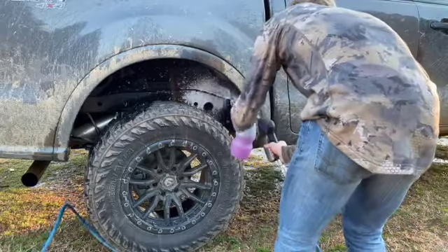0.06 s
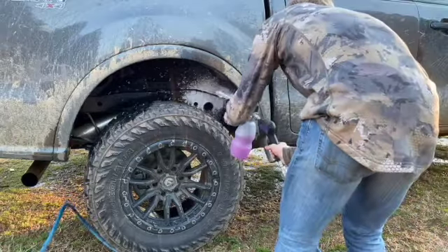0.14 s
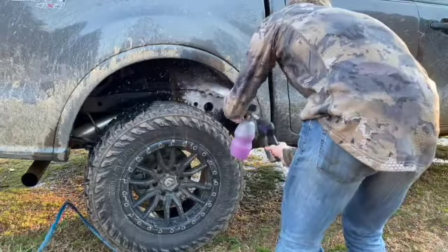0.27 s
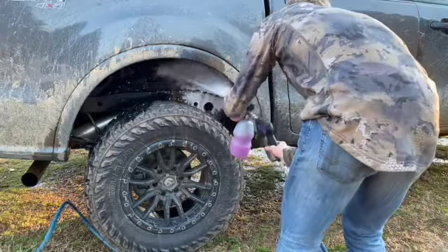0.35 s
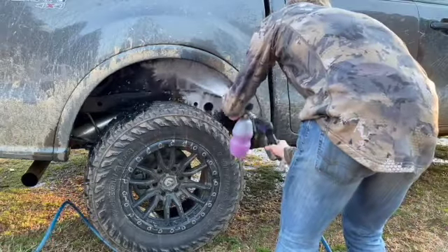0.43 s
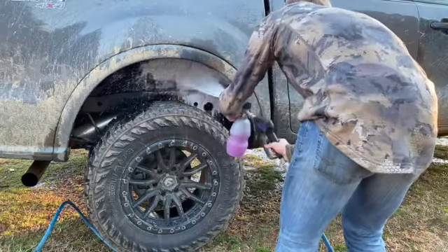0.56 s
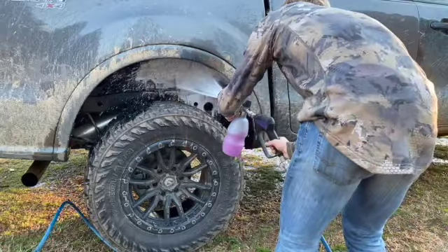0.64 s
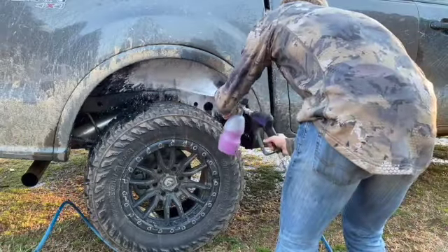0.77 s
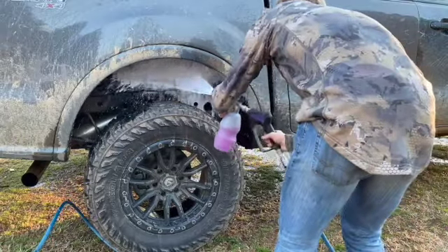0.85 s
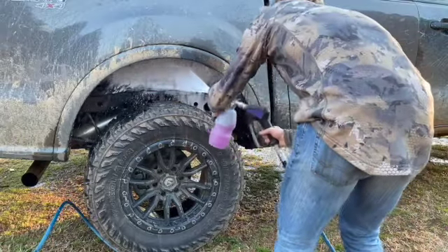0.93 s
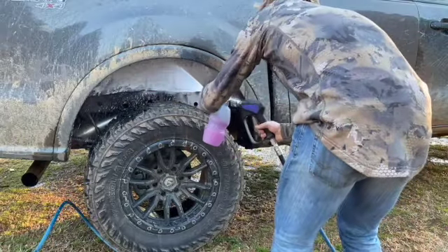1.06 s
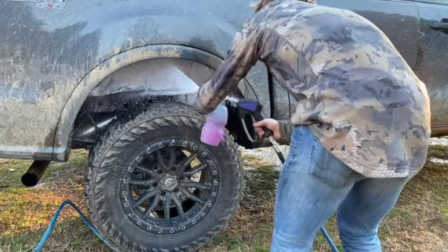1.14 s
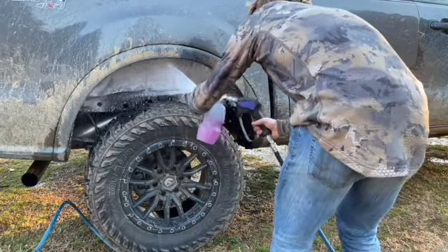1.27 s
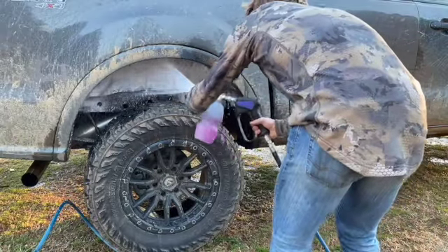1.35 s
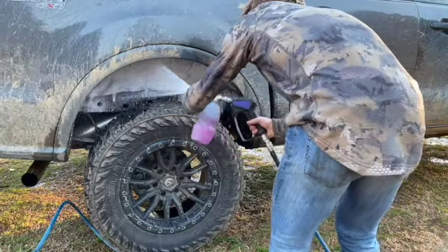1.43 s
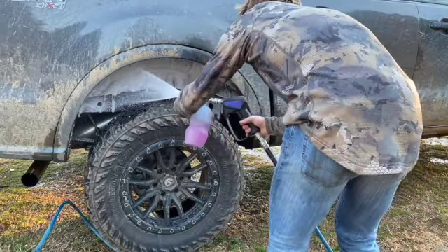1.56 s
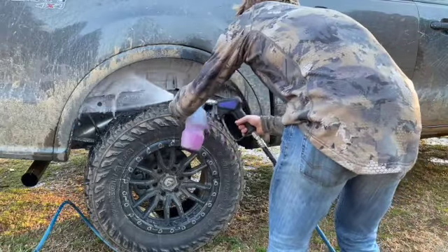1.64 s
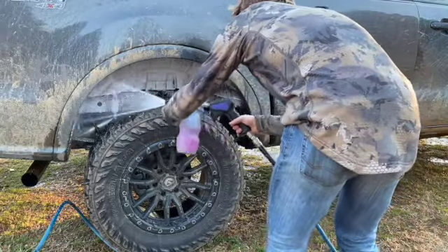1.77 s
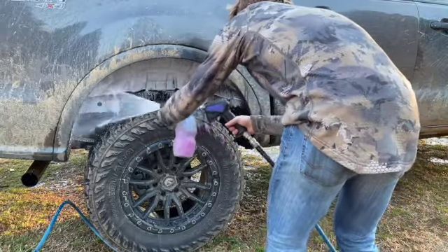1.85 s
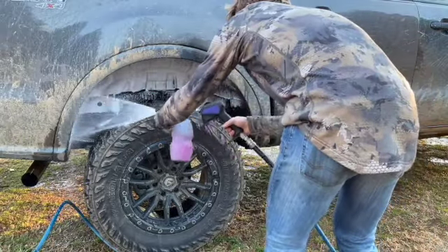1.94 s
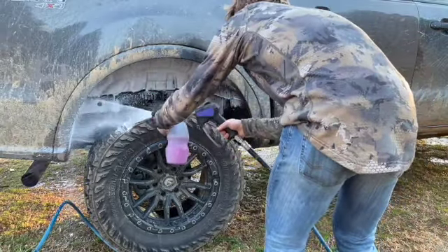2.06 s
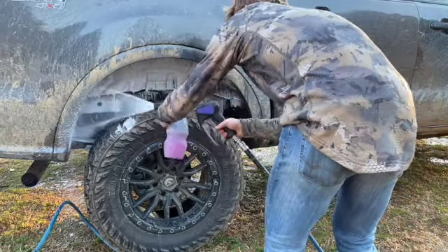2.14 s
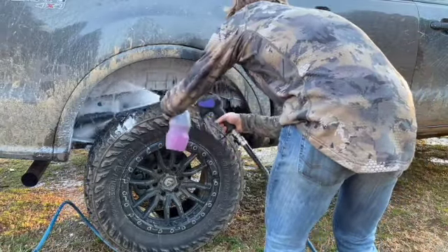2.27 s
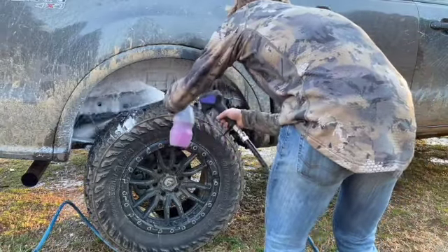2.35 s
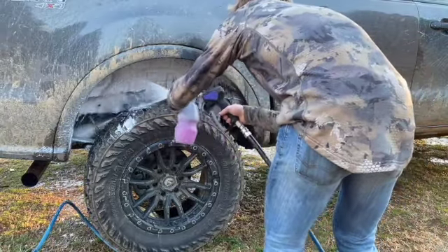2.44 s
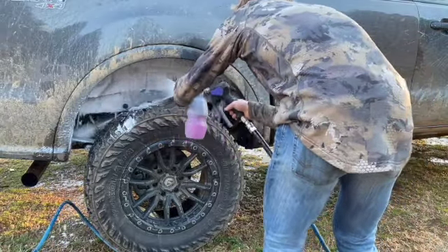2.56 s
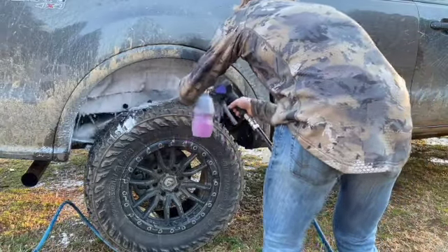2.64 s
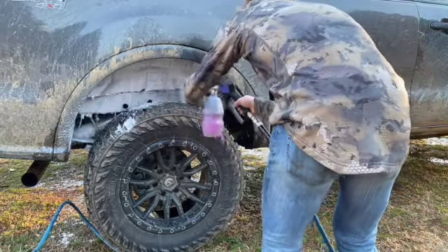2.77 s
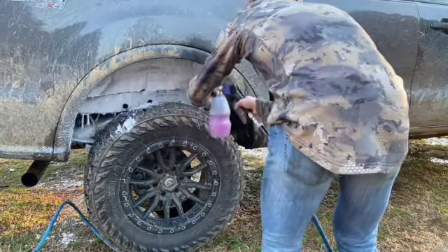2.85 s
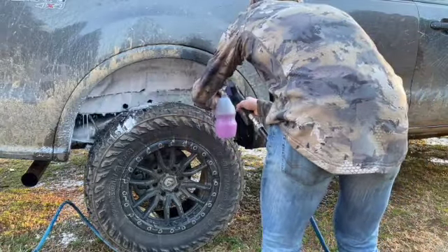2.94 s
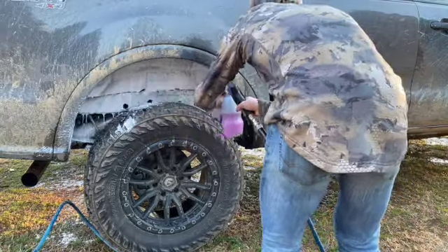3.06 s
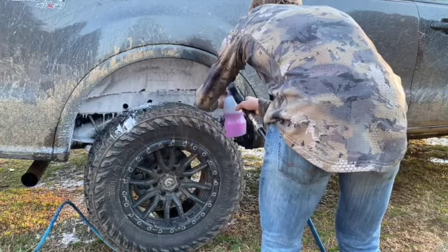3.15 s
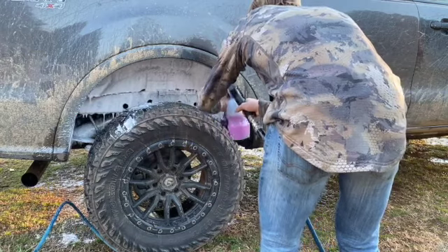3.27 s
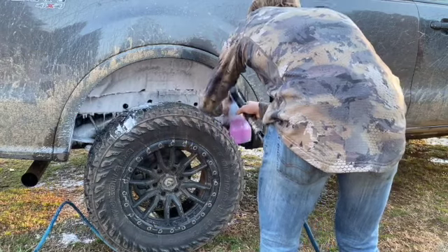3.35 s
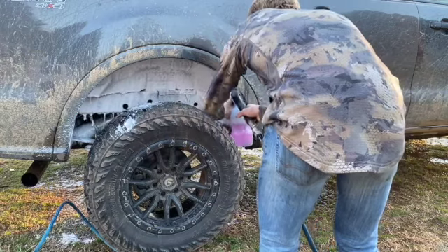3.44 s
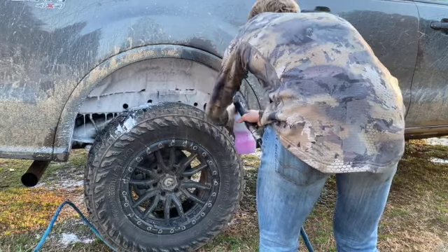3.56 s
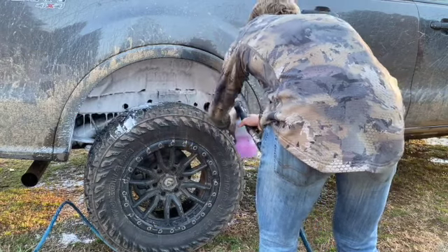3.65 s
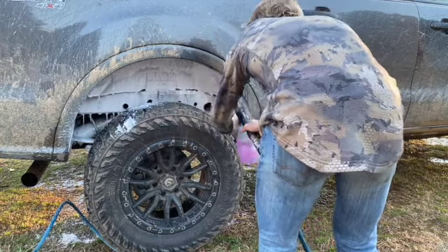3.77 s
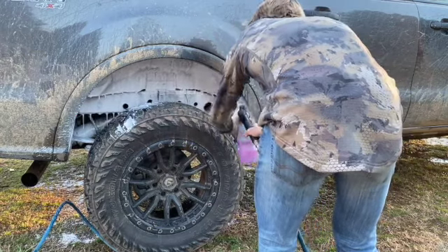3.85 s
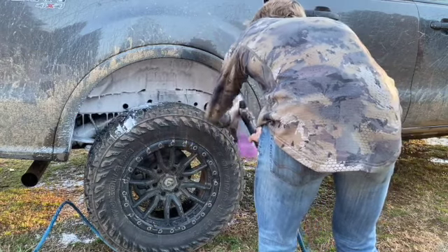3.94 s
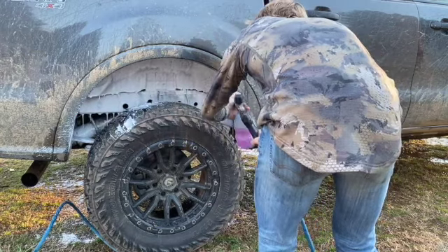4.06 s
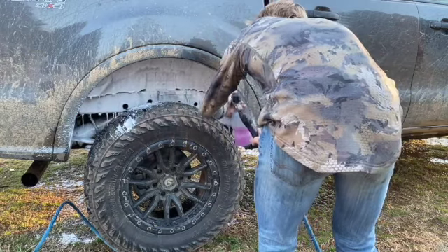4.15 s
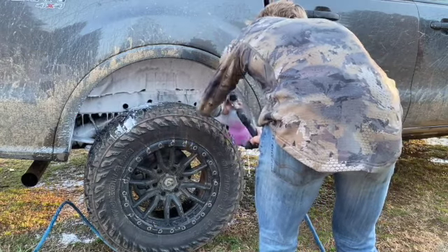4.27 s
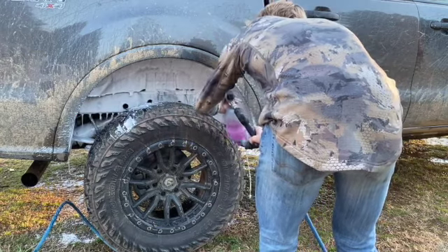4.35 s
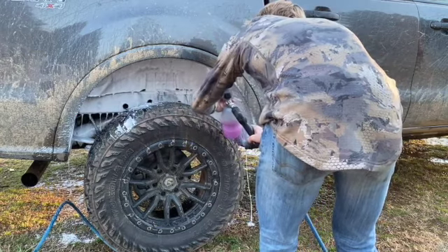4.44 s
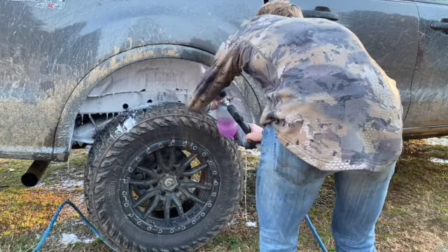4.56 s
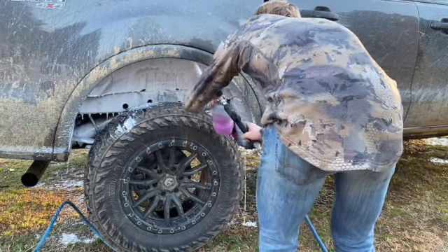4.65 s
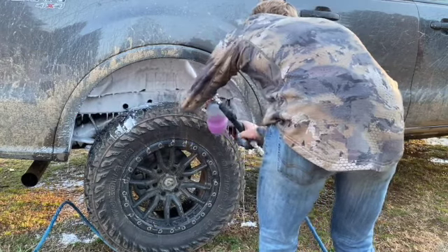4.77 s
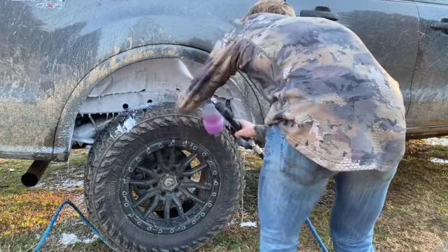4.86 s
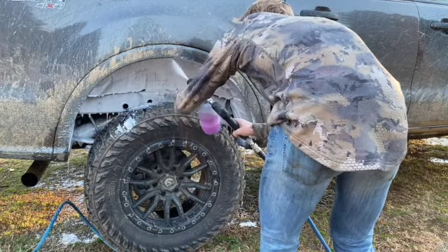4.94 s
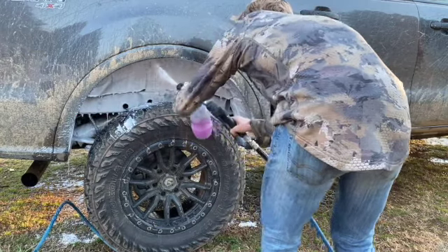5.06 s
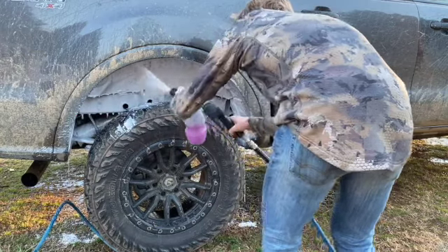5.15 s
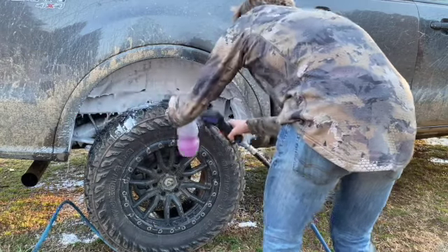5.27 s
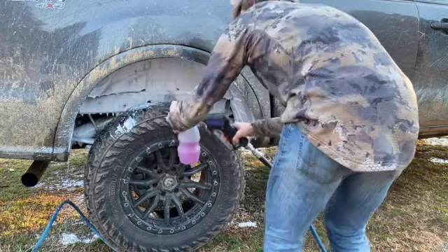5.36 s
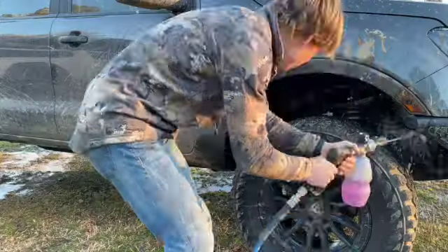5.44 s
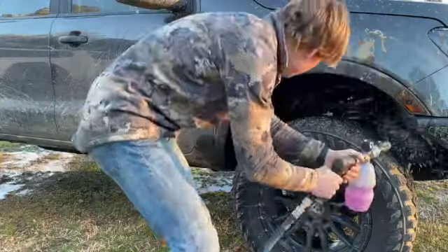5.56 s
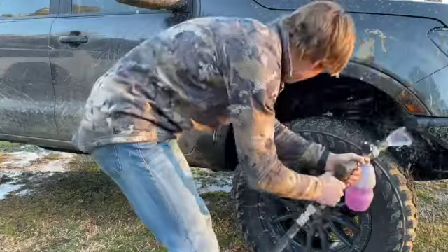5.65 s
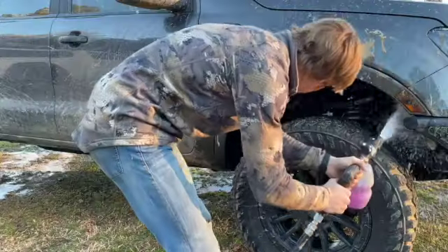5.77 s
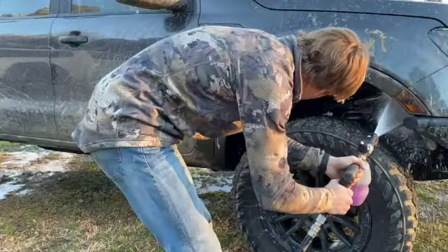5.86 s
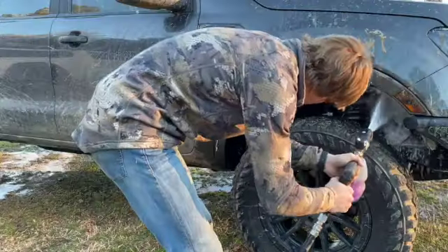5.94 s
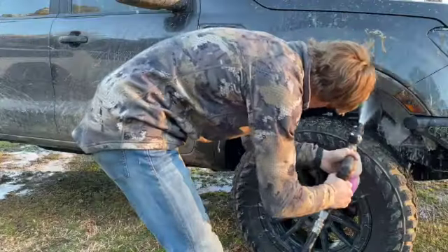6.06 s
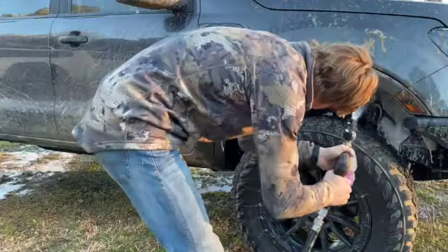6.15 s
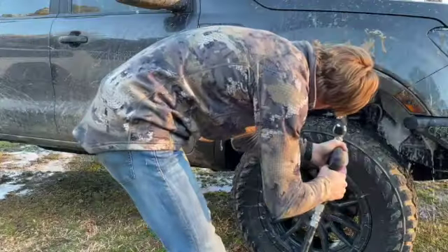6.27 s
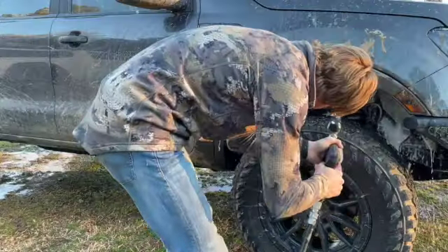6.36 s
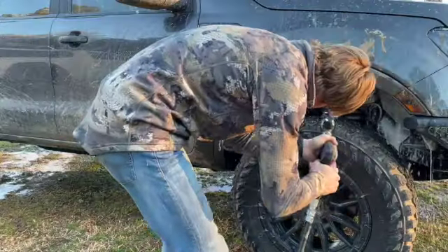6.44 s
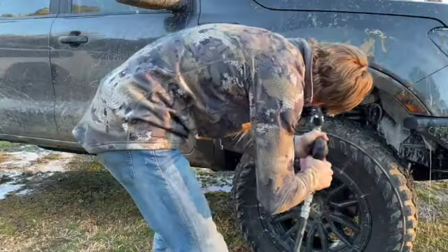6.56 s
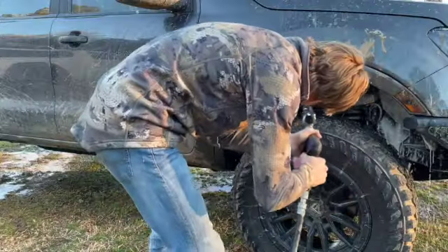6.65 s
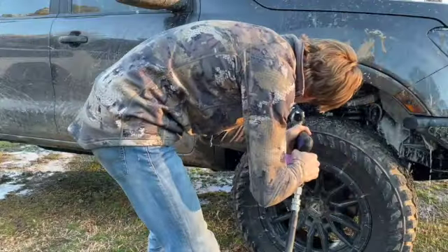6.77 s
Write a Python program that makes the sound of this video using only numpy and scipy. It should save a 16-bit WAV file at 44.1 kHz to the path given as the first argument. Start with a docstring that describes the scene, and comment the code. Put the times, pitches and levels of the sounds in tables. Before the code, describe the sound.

A small trigger click opens, followed by a few quick, hollow spits of water. By about 0.4 seconds a pressure washer is spraying foam into a truck's wheel well with a bright hiss and a brief, thin squeal. The spray holds steady, with faint wavering whistles, droplets pattering on the liner and a breathy, hollow resonance that drifts in pitch as the nozzle moves. A loose panel booms softly near 0.7 and 2.7 seconds. The hiss eases slightly from about 3.2 to 4.3 seconds, then recovers. At 5.2 seconds the jet cuts off and the lance gives several soft clicks. Water spits again around 5.5 seconds and builds to a hard, bright hiss by 5.9, settling over a deeper splash until the end, near 7 seconds. The spray is close and nearly centred, over very faint outdoor air and a distant pump hum.

```python
"""Foam cannon in a truck's wheel wells

A pressure washer sprays foam into the rear wheel well, stops, then starts on the front well.
The jet hisses and whistles, droplets patter on the liner, and the hollow behind each tyre resonates,
its pitch following the nozzle. The trigger clicks and the pump hums some way off, outdoors."""
import sys
import numpy as np
from scipy.fft import rfft, irfft, next_fast_len
from scipy.io import wavfile
from scipy.ndimage import map_coordinates

SR = 44100
rng = np.random.default_rng(int(sys.argv[2]) if len(sys.argv) > 2 else 0)


def log_audio(samples):
    """Write samples as a 16-bit WAV file to the path given in sys.argv[1]."""
    # one column per channel
    frames = np.atleast_2d(samples).T
    # limit to full scale, then quantise
    limited = np.clip(frames, -1, 1)
    pcm = np.round(limited * 32767).astype(np.int16)
    wavfile.write(sys.argv[1], SR, pcm)


N = 300321

# One pull of the trigger. In order: seconds of the spit, the water's arrival, the break into foam and
# the release; strength of the first water in dB; second of a pressure lurch (heard only before foam).
REAR_TRIGGER = (0.5, 0.05, 0.34, 5.207, -1.5, 2)
# How each layer follows the pressure, in dB against its full level.
# In order: spit, water arriving, just before the foam, draining.
SPLASH_STAGES = (-18.5, -9, 1, -21)
LOW_STAGES = (-29, -16, 1, -30)
RING_STAGES = (-38, -26, -1.5, -24)
HISS_STAGES = (-25, -17.5, -4.5, -37)
MIST_STAGES = (-29, -30.5, -8, -44)
# Fader rides on the jet. Each row: time in seconds, hiss in dB, mist in dB.
JET_RIDES = [(0.42, -29.5, -32), (0.78, -26, -31.5), (0.99, -30.5, -34), (1.56, -30, -35.5),
             (1.8, -31.5, -32.5), (2.11, -29, -32), (2.13, -29, -36), (2.92, -27.5, -28.5),
             (3.17, -32.5, -36), (3.55, -33, -40), (4.27, -34.5, -37), (4.48, -30.5, -32),
             (4.55, -32, -32.5), (5.19, -29.5, -34.5)]
# The rear hollow's pitch follows the nozzle. Each row: time in seconds, lowest mode in Hz.
REAR_PITCH = [(0.05, 837), (0.55, 794.6), (0.8, 815), (1.25, 755), (2.1, 790), (2.4, 843), (2.65, 858),
              (2.85, 925.6), (3.25, 865), (3.6, 896), (4.1, 872), (4.4, 934.5), (4.7, 850.3), (5.15, 814)]
# Cancellations between modes. Each row: pitch as a ratio to the lowest mode, width in Hz, share removed.
REAR_NOTCHES = [(0.81, 55, 0.35), (1.27, 58.6, 0.28)]
# Stereo lean. Each row: frequency in Hz, left minus right in dB.
REAR_PAN = [(100, 0), (500, .7), (1200, .2), (5200, .1), (6800, 1.8), (8300, 0), (11200, -1.3), (14000, 0)]
def rear_well():
    """The fan of foam sweeps along the rear arch, splashing, hissing and ringing the hollow."""
    hiss_db, mist_db = curves(JET_RIDES)
    pitch_hz, = curves(REAR_PITCH)
    rest_hz = 800
    stretch = pitch_hz / rest_hz
    deep = passes([(3.62, .53, .98)])  # how far the nozzle dips into the deep hollow
    jet = arch_echoes(droplets())
    sputter_db = .39 * wobble(9) + .26 * wobble(45) + .5 * wobble(170)  # foam leaves unevenly
    ring = flow(REAR_TRIGGER, RING_STAGES) * rear_ring(stretch, deep, hiss_db)
    pocket = liner_pocket()
    splash = flow(REAR_TRIGGER, SPLASH_STAGES) * rear_splash(deep)
    low = flow(REAR_TRIGGER, LOW_STAGES) * rear_low_mode(rest_hz, stretch, deep)
    hiss = amp(hiss_db + .27) * flow(REAR_TRIGGER, HISS_STAGES) * rear_hiss(jet)
    mist = flow(REAR_TRIGGER, MIST_STAGES) * rear_mist(jet, mist_db, deep)
    notches = [(ratio * pitch_hz, width, share) for ratio, width, share in REAR_NOTCHES]
    spray = notched(splash + low + ring + hiss + mist, notches)
    return placed(amp(sputter_db) * (spray + pocket), REAR_PAN)


# Tone of the hiss. Each row: frequency in Hz, relative level in dB.
REAR_HISS_EQ = [(300, -40), (800, -5), (1000, -6), (1200, -4), (1400, -3), (1950, -3.5), (2200, -2),
                (2600, -2), (3200, 0), (3600, 1.5), (4100, -1.5), (5200, -1), (6400, -2), (7300, -12),
                (8500, -15), (11000, -28.5)]
# The hiss dulls when the jet meets the liner squarely. Each row: time in seconds, brightness in dB.
BRIGHTNESS = [(0.15, -6), (0.38, 11.5), (1.1, -0.5), (1.55, 0.5), (1.8, 3.5), (2.15, 3), (2.45, -3),
              (2.85, 1.5), (3.6, 0.5), (4.45, 0)]
# The nozzle's two whistles. Each row: resting pitch in Hz, width in Hz, relative level in dB.
HIGH_WHISTLE = [(3556, 85, 0)]
LOW_WHISTLE = [(3293, 66, 0)]
# Each whistle comes forward. Each row: centre in seconds, half length in seconds, boost in dB.
HIGH_WHISTLE_SWELLS = [(0.305, .025, 9), (0.4, 0.04, 14), (0.56, .04, 3), (1.89, 0.04, 7.5),
                       (2.02, 0.09, 8), (2.28, 0.078, 7.5), (2.54, 0.036, 5), (2.88, 0.049, 7),
                       (3.35, 0.1, 8), (3.8, 0.068, 9), (5.0, .1, 3.5)]
LOW_WHISTLE_SWELLS = [(0.37, .05, 12.5), (0.54, .04, 7), (3.42, .09, 14), (3.8, 0.077, 10)]
# The high whistle follows the nozzle. Each row: time in seconds, pitch in Hz.
WHISTLE_PITCH = [(0.3, 3790), (0.42, 3705), (0.56, 3610), (0.8, 3650), (1.65, 3510), (2.3, 3570),
                 (2.9, 3520), (3.3, 3620), (3.55, 3520), (4.1, 3600), (5.0, 3640)]
def rear_hiss(jet):
    """The jet's hiss tilts as it meets the liner, and carries two wavering whistles."""
    bright_db, = curves(BRIGHTNESS)
    tone = coloured(jet, REAR_HISS_EQ)
    pivot_hz = 3800
    dull = filtered(tone, lambda hz: 1 / (1 + (hz / pivot_hz) ** 4))
    tilted = amp(-bright_db) * dull + amp(.5 * bright_db) * (tone - dull)
    high_gain = amp(-13.5 + passes(HIGH_WHISTLE_SWELLS) + 1.2 * wobble(14))
    low_gain = amp(-18.5 + passes(LOW_WHISTLE_SWELLS))
    whistle_hz = curves(WHISTLE_PITCH)[0] * (1 + .006 * wobble(12))
    high = high_gain * swept(HIGH_WHISTLE, whistle_hz / HIGH_WHISTLE[0][0])
    low = low_gain * swept(LOW_WHISTLE, 1 + .007 * wobble(8))
    return (tilted + high + low) / np.sqrt(1 + high_gain ** 2 + low_gain ** 2)


# Tone of the mist. Each row: frequency in Hz, relative level in dB.
REAR_MIST_EQ = [(4290, -28), (7300, -3.5), (11500, 0), (15100, -7.5), (16000, -8)]
def rear_mist(jet, mist_db, deep):
    """Fine mist; the louder it is, the more of its highest fizz gets past the arch."""
    shadow_hz, shadow_width_hz, fizz_hz = 7748, 390, 11500
    tone = coloured(jet, REAR_MIST_EQ)
    shadow = filtered(tone, lambda hz: np.exp(-((hz - shadow_hz) / shadow_width_hz) ** 2))
    tone = tone - .51 * deep * shadow  # the deep hollow swallows this band
    fizz = filtered(tone, lambda hz: 1 - 1 / (1 + (hz / fizz_hz) ** 8))
    opening_db = .4 * np.clip(mist_db + 29, -8, 6)
    return amp(mist_db - .34) * (tone + (amp(opening_db) - 1) * fizz)


# The rear hollow's main ring, its overtones, and the ring of its deep part.
# Each row: resting pitch in Hz, width in Hz, relative level in dB.
MAIN_MODE = [(1175, 162, 0)]
OVERTONE_MODES = [(1550, 270, 0), (1840, 144, 0)]
DEEP_HOLLOW_MODES = [(1270, 170, 3.5), (1427, 130, -2), (1737, 120, -2.5)]
# Fader ride on the whole ring. Each row: time in seconds, level in dB.
RING_RIDE = [(0.42, -31.5), (0.55, -31), (0.68, -29), (0.88, -29), (1.0, -26.5), (1.12, -30), (1.24, -33),
             (1.42, -31.5), (2.19, -36), (3.09, -35.5), (3.4, -33), (3.6, -34), (3.8, -35), (3.95, -39),
             (4.25, -37.5), (4.6, -34.5), (5.19, -34)]
# Overtone balance. Each row: time in seconds, level against the main ring in dB.
OVERTONE_RIDE = [(0.24, -5), (0.3, 2), (0.45, -3.5), (0.8, -4.5), (1.02, -7), (1.5, -4), (2.4, -1.5),
                 (4.2, 0), (4.6, 1), (5.15, -1.5)]
# The deep hollow follows the nozzle. Each row: time in seconds, strongest mode in Hz.
DEEP_PITCH = [(3.1, 1221), (3.45, 1275), (3.82, 1364), (4.0, 1200), (4.6, 1220)]
# The ring drums briefly. Each row: centre in seconds, half length in seconds, level change in dB.
RING_ACCENTS = [(0.244, .012, 8), (0.295, .018, 5), (0.647, 0.0073, 4.5), (3.31, .01, -1), (3.385, .012, 2)]
def rear_ring(stretch, deep, hiss_db):
    """Spray rings the upper modes behind the rear tyre, crossfading into those of the deep hollow."""
    ring_db, = curves(RING_RIDE)
    deep_hz, = curves(DEEP_PITCH)
    overtone_gain = amp(curves(OVERTONE_RIDE)[0])
    shift = stretch ** .4  # these modes bend less than the lowest
    shallow = swept(MAIN_MODE, shift) + overtone_gain * swept(OVERTONE_MODES, shift)
    shallow /= np.hypot(1, overtone_gain)
    deep_ring = swept(DEEP_HOLLOW_MODES, deep_hz / DEEP_HOLLOW_MODES[0][0])
    ring = np.sqrt(1 - deep) * shallow + np.sqrt(deep) * deep_ring
    # when the jet points out of the hollow, its bare hiss takes over from the ring
    inside = np.sqrt(np.clip(1 - amp(2 * (hiss_db - ring_db - 9.5)), .08, 1))
    return amp(ring_db + 1.07 - 2.5 * deep + passes(RING_ACCENTS)) * inside * ring


# Surges and dips. Each row: centre in seconds, half length in seconds, level change in dB.
LOW_MODE_SURGES = [(0.55, .05, 5.5), (1.35, .07, 1), (1.9, 0.12, 1), (2.55, .07, -1), (2.97, 0.08, -4.5),
                   (3.52, 0.1, 2.5), (4.0, .1, -3), (4.8, 0.38, 1), (5.175, 0.016, 4), (5.215, 0.017, -17)]
def rear_low_mode(rest_hz, stretch, deep):
    """Spray drives the rear hollow's lowest mode, a breathy note that glides with the nozzle."""
    width_hz = 105
    level_db = -36.5 + .5 * deep + passes(LOW_MODE_SURGES) + .52 * wobble(10)
    return amp(level_db) * swept([(rest_hz, width_hz, 0)], stretch * (1 + .01205 * wobble(6)))


# Tone of the splash. Each row: frequency in Hz, relative level in dB.
REAR_SPLASH_EQ = [(50, -50), (110, -30), (195, -19.5), (265, -9), (330, -8), (400, -2.5), (500, 1.5),
                  (580, -1), (680, 1), (1000, -10.5), (1600, -11.5), (2600, -30)]
# A loose panel's boom. Each row: pitch in Hz, width in Hz, relative level in dB.
PANEL_MODE = [(149, 31, -2)]
# Splash and boom swell or ebb. Each row: centre in seconds, half length in seconds, level change in dB.
SPLASH_SWELLS = [(1.15, .3, -2.5), (1.68, 0.085, 4), (2.5, .1, 1.5), (2.95, 0.17, -0.5), (3.78, .09, 0.5)]
BOOM_SWELLS = [(0.7, 0.55, 12.5), (1.95, .25, 2), (2.73, 0.19, 11.5), (3.85, .3, -4), (5.17, .12, 11)]
def rear_splash(deep):
    """Droplets patter on the rear liner, and a loose panel booms as the jet crosses it."""
    boom = amp(-27.5 + passes(BOOM_SWELLS)) * resonate(droplets(), PANEL_MODE)
    level_db = -38.5 + .7 * deep + passes(SPLASH_SWELLS) + .95 * wobble(9)
    return amp(level_db) * (coloured(droplets(), REAR_SPLASH_EQ) + boom)


# The pocket's note. Each row: pitch in Hz, width in Hz, relative level in dB.
POCKET_MODE = [(716, 75, 0)]
# Passes over it. Each row: centre in seconds, half length in seconds, peak level in dB.
POCKET_SWELLS = [(2.199, .07, -43), (2.76, 0.18, -38), (3.78, 0.068, -38.5), (4.65, 0.27, -41)]
def liner_pocket():
    """The jet catches a lower-pitched pocket of the liner in passing."""
    gain = passes([(s, half_s, amp(db)) for s, half_s, db in POCKET_SWELLS])
    return gain * resonate(droplets(), POCKET_MODE)


# The second pull of the trigger, laid out like REAR_TRIGGER.
FRONT_TRIGGER = (5.474, 5.574, 5.858, 7.0, 2.1, 5.757)
# Tone of the splash, hiss and mist. Each row: frequency in Hz, relative level in dB.
FRONT_SPLASH_EQ = [(50, -44), (130, -17), (200, -19), (270, -10), (400, -3), (470, 1.5), (510, 6),
                   (560, -2.5), (650, 2), (780, -11), (1000, -10), (2000, -32)]
FRONT_HISS_EQ = [(500, -42), (1050, -10), (1300, -2.5), (1550, 4.5), (2000, 1.5), (2400, 3), (3400, 3.5),
                 (4000, 2.5), (4600, 1.5), (5500, -1.5), (6400, -0.5), (7300, -18), (8500, -18),
                 (11000, -35)]
FRONT_MIST_EQ = [(4290, -23), (7300, -0.5), (7800, -2.5), (11000, -3), (13000, -10), (14100, -10),
                 (15200, -14), (16000, -19)]
# The hollow's midrange body, and the ring that nozzle and arch give the hiss.
# Each row: pitch in Hz, width in Hz, relative level in dB.
BODY_MODES = [(1097, 120, 4), (836, 220, 1.5)]
ARCH_MODES = [(2910, 190, -6.5), (4000, 150, -3.5), (5530, 580, -3), (6220, 780, -4)]
# Water slaps the liner unevenly. Each row: centre in seconds, half length in seconds, change in dB.
FRONT_SLAPS = [(5.62, 0.033, 2.5), (5.7, 0.023, -1.5), (5.78, 0.031, 2.5), (6.52, 0.033, 4)]
# A steady cancellation in the hollow. Each row: frequency in Hz, width in Hz, share removed.
FRONT_NOTCHES = [(940, 61, 0.29)]
# Another rises as the foam forms. Each row: time in seconds, frequency in Hz.
RISING_NOTCH = [(5.6, 1000), (5.8, 1100), (5.9, 1340), (6.3, 1320), (6.8, 1318)]
def front_well():
    """The jet hits the front arch, hard and bright while fresh, then settles over a deep splash."""
    foam_s, settle_s = FRONT_TRIGGER[2], .53
    fresh = np.exp(-since(foam_s) / settle_s)
    jet = arch_echoes(droplets())
    sputter_db = .69 * wobble(45) + .5 * wobble(170)
    splash_gain = amp(-35 + passes(FRONT_SLAPS) + 1.8 * wobble(7.9))
    splash = splash_gain * flow(FRONT_TRIGGER, SPLASH_STAGES) * coloured(droplets(), FRONT_SPLASH_EQ)
    body = amp(-38 - 2.5 * fresh) * step(foam_s, .1) * resonate(droplets(), BODY_MODES)
    ring = amp(-36 + .5 * fresh) * front_ring(foam_s)
    hollow = flow(FRONT_TRIGGER, RING_STAGES) * (body + ring)
    arch_gain = amp(-9.5 + 15.5 * fresh) * step(foam_s, .13)  # only the foaming jet rings the arch
    arch = arch_gain * resonate(droplets(), ARCH_MODES)
    tone = (coloured(jet, FRONT_HISS_EQ) + arch) / np.hypot(1, arch_gain)
    hiss = amp(-32 + 4 * fresh) * flow(FRONT_TRIGGER, HISS_STAGES) * tone
    mist = amp(-38.5 + 6 * fresh) * flow(FRONT_TRIGGER, MIST_STAGES) * coloured(jet, FRONT_MIST_EQ)
    rising = (curves(RISING_NOTCH)[0], 89, .51)  # Hz, width in Hz, share removed
    spray = notched(splash + hollow + hiss + mist, [*FRONT_NOTCHES, rising])
    return placed(amp(sputter_db) * spray, FRONT_PAN)


# The front hollow's bright modes. Each row: resting pitch in Hz, width in Hz, relative level in dB.
FRONT_HOLLOW_MODES = [(1600, 160, 0), (1788, 89, -1)]
# They follow the nozzle. Each row: time in seconds, lower mode in Hz, upper mode in Hz.
FRONT_PITCHES = [(5.721, 1563, 1750), (5.95, 1546, 1820), (6.08, 1558, 1848), (6.27, 1640, 1722),
                 (6.52, 1685, 1790), (6.8, 1688, 1820)]
# The jet crosses the hollow's mouth. Each row: centre in seconds, half length in seconds, boost in dB.
MOUTH_SWELLS = [(5.6, .04, 1), (5.745, 0.042, 6.5), (6.29, 0.09, 4.5)]
def front_ring(foam_s):
    """Two modes behind the front tyre draw together and part; the upper grows in as the foam forms."""
    lower, upper = [amp(db) * swept([(rest_hz, width, db)], hz / rest_hz)
                    for (rest_hz, width, db), hz in zip(FRONT_HOLLOW_MODES, curves(FRONT_PITCHES))]
    return amp(passes(MOUTH_SWELLS)) * (lower + step(foam_s, .3) * upper)


def flow(trigger, stages):
    """A layer's gain through one pull: spit, rising pressure, full foam, shut-off and draining."""
    spit_s, water_s, foam_s, release_s, first_db, lurch_s = trigger
    spit_db, water_db, almost_db, drain_db = stages
    arrive_s, break_s, lurch_share = .031, .019, .23
    spit_db_per_s, shut_db_per_s, drain_db_per_s = 87, 529, 55
    spit = step(spit_s, .004) * amp(first_db + spit_db - spit_db_per_s * since(spit_s))
    ramp = np.clip(since(water_s) / (foam_s - water_s), 0, 1) ** 1.26  # builds slowly, then faster
    pressure = (1 - lurch_share) * ramp + lurch_share * step(lurch_s, .012)
    building_db = (first_db + water_db) * (1 - pressure) + almost_db * pressure
    jet = step(water_s, arrive_s) * amp(building_db * (1 - step(foam_s, break_s)))
    collapse = amp(-shut_db_per_s * since(release_s))
    drain = amp(drain_db - drain_db_per_s * since(release_s))
    return np.hypot(spit, jet) * np.maximum(collapse, drain)


def droplets(size=N, per_s=1400, spread_db=4, drop_db=-6):
    """Turbulent rush plus single droplet impacts of random size."""
    lands = rng.random(size) < per_s / SR
    strength = amp(spread_db * np.clip(rng.standard_normal(size), -2, 2))
    rush = rng.standard_normal(size)
    hits = lands * strength * rng.choice([-1, 1], size)
    return unit(rush + amp(drop_db) * unit(hits))


def swept(modes, stretch):
    """Spray-driven resonances whose pitches all move by the factor stretch."""
    ring = resonate(droplets(size=N + N // 4), modes)
    return map_coordinates(ring, [np.cumsum(stretch)], order=1, mode="wrap")


def arch_echoes(x, count=6, gain=.14, near_s=.0012, far_s=.005, drift_s=.00022):
    """Close reflections off tyre and arch; their paths drift as the nozzle moves."""
    delays_s = np.geomspace(near_s, far_s, count) * rng.uniform(.849, 1.15, count)
    echoes = [map_coordinates(x, [np.arange(N) - SR * (delay + drift_s * wobble(2.5))], order=3)
              for delay in delays_s]
    return unit(x + gain * sum(echoes))


# Stereo lean of the front well. Each row: frequency in Hz, left minus right in dB.
FRONT_PAN = [(200, -.5), (500, 1.5), (1100, 1.5), (1700, 2.6), (2700, 0.6), (5200, 0), (7000, 3.5),
             (8700, -0.5)]
# Colour of the side signal. Each row: frequency in Hz, side-channel level in dB.
SIDE_EQ = [(60, -39), (190, -13), (380, -31.5), (630, -15.5), (1100, -54), (3500, -100), (6000, -15.5),
           (8000, -41), (10500, -19), (13000, -33), (15000, -63)]
def placed(x, pan):
    """A nearly mono source, leaning between the ears, with a faint, slightly late difference added between the
    channels."""
    late = np.pad(x, (SR // 140, 0))[:N]
    side = filtered(late, lambda hz: amp(along(SIDE_EQ, hz)))
    stereo = np.array([x + side, x - side])
    return filtered(stereo, lambda hz: amp(np.outer([.5, -.5], along(pan, hz))))


# The first slugs of water. Each row: start in seconds, level in dB.
SLUGS = [(0.092, -32), (0.121, -27), (0.27, -24)]
def gulps(pitch_hz=848, attack_s=.0033, t60_s=.1):
    """Each slug of water rings the rear hollow's lowest mode, which dies quickly."""
    out = np.zeros(N)
    for start_s, db in SLUGS:
        age = since(start_s)
        envelope = amp(db - 60 * age / t60_s) * (1 - np.exp(-age / attack_s))
        out += envelope * np.sin(2 * np.pi * pitch_hz * age + .47 * wobble(150))
    return out


# Squeals, mostly while the pressure builds.
# Each row: start in seconds, hold in seconds, pitch in Hz, width in Hz, level in dB.
NOZZLE_SQUEALS = [(0.065, 0.16, 11300, 600, -62), (0.283, 0.046, 6500, 300, -40),
                  (0.358, .035, 6000, 250, -35), (0.43, .36, 6320, 240, -41),
                  (4.07, 0.11, 6100, 200.1, -43), (5.762, .1, 6080, 140, -42), (5.865, .04, 6400, 700, -36)]
def squeals(attack_s=.0086, fade_db_per_s=200):
    """The nozzle sings in a thin, high band that opens at once and fades."""
    out = np.zeros(N)
    for start_s, hold_s, hz, width, db in NOZZLE_SQUEALS:
        envelope = step(start_s, attack_s) * amp(db - fade_db_per_s * since(start_s + hold_s))
        out += envelope * resonate(droplets(), [(hz, width, 0)])
    return out


# Handling clicks, and a drip of water after the shut-off. Each row: start in seconds, level in dB, pitch in Hz.
TICKS = [(0.051, -42, 2900), (5.263, -51, 4700), (5.366, -53, 2285), (5.381, -51, 1240),
         (5.415, -45, 1100), (5.417, -48, 1970), (5.478, -44, 2670)]
def clicks(attack_s=.001, t60_s=.036):
    """Small dull clicks of the trigger and plastic lance, and a drip of water after the shut-off."""
    t, out = np.arange(SR // 4) / SR, np.zeros(N)
    for start_s, db, hz in TICKS:
        ring = resonate(rng.standard_normal(len(t)), [(hz, .19 * hz, 0)])
        envelope = amp(db - 60 * t / t60_s) * (1 - np.exp(-t / attack_s))
        out[round(start_s * SR):][:len(t)] += envelope * ring
    return out


# The pump's hum. Each row: multiple of the stroke rate, relative level in dB.
PUMP_HARMONICS = [(1, 3.5), (2, -12), (3, 1.5), (5, 0)]
def pump(stroke_hz=80, idle_db=-70, loaded_db=-62.5, front_db=-79, stop_db_per_s=50):
    """The pump's strokes hum at a nearly steady rate, louder under load and much fainter from the second pull
    on."""
    foam_s, release_s = REAR_TRIGGER[2:4]
    load = step(foam_s - .08, .15)
    rear_db = idle_db + (loaded_db - idle_db) * load - stop_db_per_s * since(release_s)
    level_db = rear_db + (front_db - rear_db) * step(FRONT_TRIGGER[0], .05)
    phase = 2 * np.pi * np.cumsum(stroke_hz * (1 + .0016 * wobble(4.5))) / SR
    hum = sum(amp(db + .34 * wobble(4.15)) * np.sin(k * phase) for k, db in PUMP_HARMONICS)
    return amp(level_db) * np.sqrt(2) * hum


# Tone of the outdoor bed. Each row: frequency in Hz, relative level in dB.
AIR_EQ = [(20, -46), (50, -30), (75, 3), (140, 3), (250, 1), (330, 1), (450, -1), (750, -8), (1200, -4),
          (2000, -5), (5000, -12), (15000, -28)]
# Its fader ride. Each row: time in seconds, level in dB.
AIR_RIDE = [(0, -57.5), (5.38, -57.5), (5.405, -61)]
def open_air():
    """A soft, low bed of outdoor noise that drops a little between the two wells."""
    air_db, = curves(AIR_RIDE)
    return amp(air_db) * coloured(rng.standard_normal(N), AIR_EQ)


def amp(db):
    """Decibels to gain."""
    return 10 ** (np.asarray(db) / 20)


def unit(x):
    """Scale to rms 1."""
    return x / np.sqrt(np.mean(x ** 2) + 1e-20)


def along(points, hz):
    """(Hz, value) points read on a log axis."""
    freqs, values = np.transpose(points)
    return np.interp(np.log(hz + 1), np.log(freqs + 1), values)


def curves(rows):
    """One value per sample for each column after the time."""
    times, *columns = np.transpose(rows)
    return [np.interp(np.arange(N) / SR, times, column) for column in columns]


def wobble(rate):
    """A smooth random curve, rate knots a second."""
    return map_coordinates(rng.standard_normal(int(N * rate / SR) + 4), [np.arange(N) * rate / SR])


def since(s):
    """Seconds since a moment, zero before it."""
    return np.maximum(np.arange(N) / SR - s, 0)


def step(s, length_s):
    """A ramp from 0 to 1 centred on a moment."""
    return np.clip((np.arange(N) / SR - s) / length_s + .5, 0, 1)


def passes(rows):
    """Bell-shaped swells, (centre s, half length s, height), as the jet passes something."""
    t = np.arange(N) / SR
    return sum(height * np.exp(-.5 * ((t - s) / half_s) ** 2) for s, half_s, height in rows)


def filtered(x, response):
    """x times a complex response of frequency."""
    size = x.shape[-1]
    padded = next_fast_len(size + SR // 4)
    return irfft(rfft(x, padded) * response(np.fft.rfftfreq(padded, 1 / SR)), padded)[..., :size]


def coloured(x, eq):
    """x through an EQ curve, at rms 1."""
    return unit(filtered(x, lambda hz: amp(along(eq, hz))))


def resonate(x, modes, skirt=1.8):
    """x through (Hz, width Hz, dB) resonances whose far skirts fall steeply, at rms 1."""
    def peak(f, hz, width):
        return 1j * f * width / (hz * hz - f * f + 1j * f * width)
    return unit(filtered(x, lambda f: sum(amp(db) * peak(f, hz, width) * abs(peak(f, hz, skirt * width))
                                          for hz, width, db in modes)))


def notched(x, notches):
    """x with narrow bands partly cancelled, (Hz, width Hz, share) each; their pitch may move."""
    for hz, width_hz, share in notches:
        phase = 2 * np.pi * np.cumsum(hz * np.ones(N)) / SR
        carrier = np.array([np.cos(phase), np.sin(phase)])
        baseband = filtered(x * carrier, lambda f: np.exp(-(f / width_hz) ** 2))
        x = x - share * 2 * np.sum(carrier * baseband, axis=0)
    return x


def scene():
    """The trigger opens on the rear well, later on the front well, over the pump and the open air."""
    air = open_air()
    return rear_well() + front_well() + gulps() + squeals() + pump() + clicks() + air


def record(dry):
    """The phone drops the deepest bass and keeps nothing above its band limit."""
    bass_hz, top_hz = 58, 15950
    return filtered(dry, lambda hz: (hz < top_hz) * np.sqrt(1 - 1 / (1 + (hz / bass_hz) ** 4)))


dry = scene()
out = record(dry)
log_audio(out)
```